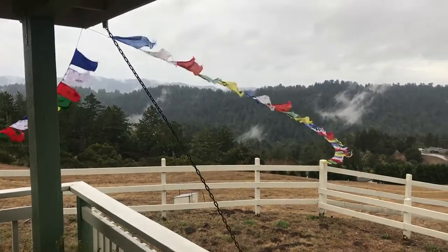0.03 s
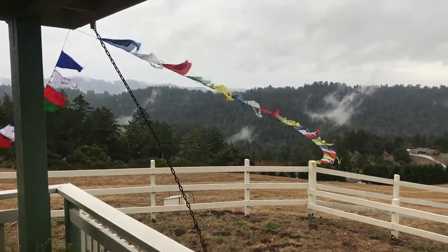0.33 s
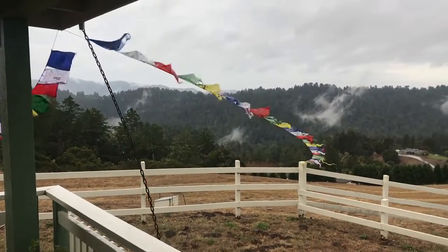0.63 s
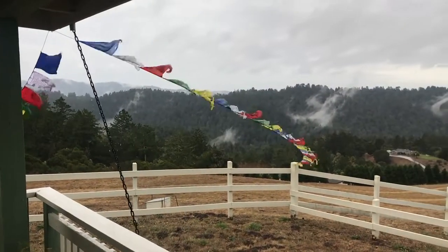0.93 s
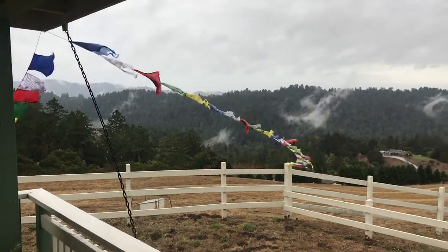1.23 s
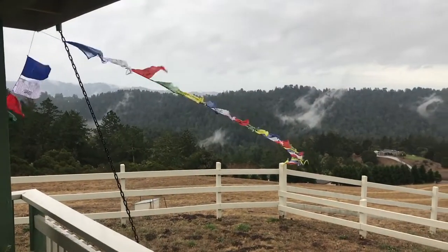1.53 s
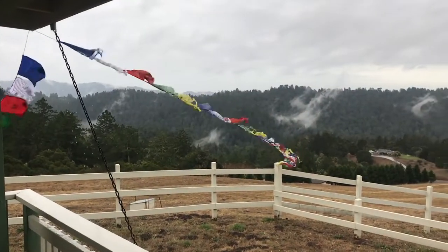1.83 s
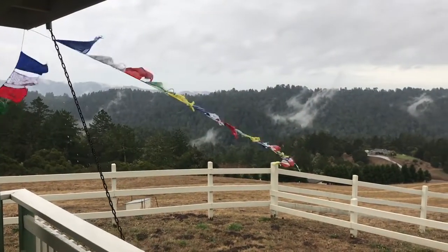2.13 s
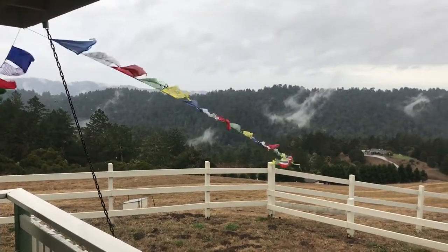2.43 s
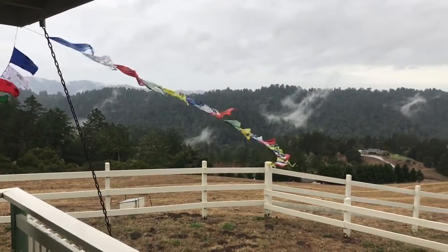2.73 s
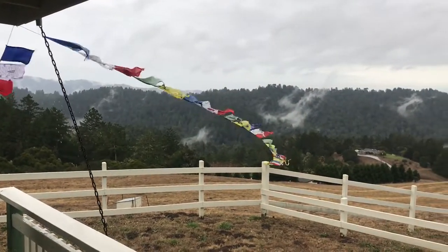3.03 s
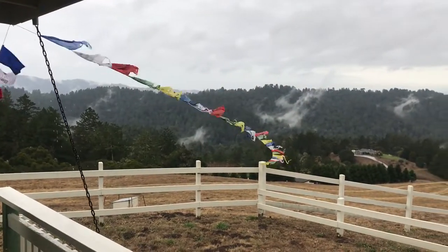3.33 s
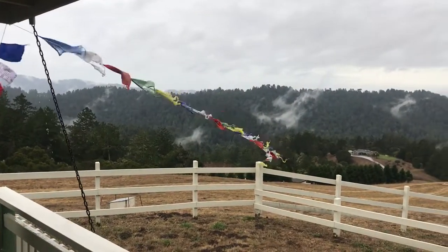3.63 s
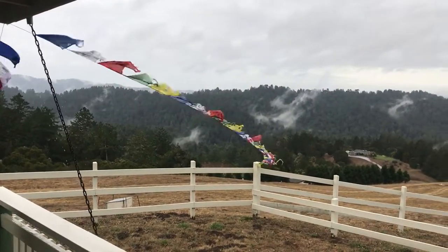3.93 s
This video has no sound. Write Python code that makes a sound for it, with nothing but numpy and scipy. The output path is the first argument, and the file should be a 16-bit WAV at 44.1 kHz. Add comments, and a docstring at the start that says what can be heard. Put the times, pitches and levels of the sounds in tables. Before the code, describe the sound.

Strings of cloth flags flutter outdoors by a porch, with sharp snaps and crisp crackles. Wind rumbles on the microphone at first, then drops to a softer rush in the trees; lighter gusts return as the flapping continues.

```python
"""Strings of small cloth flags in a strong wind, heard on one microphone beside a covered porch.
At first gusts buffet the microphone and the flags flap hard: each flap is a snap and a quick run of
cloth pops, with crisp ticks on top, and the porch throws them back. More gusts hit around 1 s.
Then the rush in the trees behind eases and the flaps soften. Lighter gusts thump in near 3 s,
and the flags flutter on to the end."""
import sys
import numpy as np
from scipy import signal
from scipy.fft import rfft, irfft
from scipy.io import wavfile
from scipy.ndimage import uniform_filter1d

SR = 44100
rng = np.random.default_rng(int(sys.argv[2]) if len(sys.argv) > 2 else 0)


def store_pcm(level_fs):
    """Save levels as 16-bit WAV."""
    pcm = np.round(np.clip(level_fs, -1, 1) * 32767).astype(np.int16)
    wavfile.write(sys.argv[1], SR, np.atleast_2d(pcm).T)


N = 176400
TIME = np.arange(N) / SR
CLOTH_RISE_S = 0.0003


# Spectrum of one pop of cloth (frequency over pitch [ratio], level [dB])
POP_SPECTRUM = [(.03, -18), (.2, -2), (.5, -2), (1, -2.5), (1.4, -9.5), (2, -16.5), (3, -28.5), (6, -40),
                (40, -57)]
# Loud flaps in the foreground (time [s], snap level [dB], ruffle level [dB], pitch [Hz], decay [s])
LOUD_FLAPS = [(0.0335, -26, -31.5, 1100, 0.008), (0.1175, -26, -40, 1900, 0.008),
              (0.16, -32, -38, 280, 0.015), (0.283, -34, -42, 1300, 0.009), (0.365, -38, -44, 1100, 0.02),
              (0.414, -31, -35, 220, 0.012), (0.424, -29, -37, 1000, 0.007), (0.483, -38, -49, 2200, 0.008),
              (0.535, -37, -44, 1200, 0.02), (0.6, -38, -43.5, 900, 0.02), (0.622, -35, -44, 1500, 0.01),
              (0.672, -33, -42.5, 1400, 0.012), (0.731, -32, -41.5, 2000, 0.011),
              (0.76, -37, -43.5, 500, 0.02), (0.96, -39, -45, 800, 0.015), (0.975, -36, -43, 1500, 0.015),
              (1.06, -35, -44, 1300, 0.008), (1.401, -35, -44, 1200, 0.006), (1.483, -39, -48, 1400, 0.008),
              (1.5405, -29, -39, 1800, 0.007), (1.548, -38, -42, 280, 0.012),
              (1.598, -38, -42.5, 300, 0.009), (1.825, -42, -42.5, 320, 0.012),
              (1.914, -41, -43, 310, 0.016), (1.949, -42, -45, 320, 0.01), (2.062, -40, -49.0, 800, 0.02),
              (2.158, -41, -45, 260, 0.012), (2.183, -35, -44.5, 1000, 0.005),
              (2.186, -39, -41, 280, 0.014), (2.214, -39, -49, 1000, 0.012), (2.288, -39, -43, 220, 0.014),
              (2.355, -36, -46, 1000, 0.006), (2.383, -40, -48.5, 700, 0.015),
              (2.542, -38, -44.5, 1100, 0.02), (2.552, -42, -50, 1000, 0.02), (2.594, -43, -49, 750, 0.012),
              (2.645, -41, -46.5, 1100, 0.015), (2.707, -40, -45, 950, 0.008),
              (2.774, -38, -44.5, 1050, 0.017), (2.812, -42, -48, 1000, 0.012),
              (2.9215, -36, -46, 2400, 0.003), (2.962, -38, -44.5, 900, 0.014), (3.02, -41, -50, 750, 0.01),
              (3.073, -37, -45, 700, 0.009), (3.092, -38, -45, 1000, 0.007), (3.135, -35, -42, 850, 0.007),
              (3.3225, -32, -44, 900, 0.012), (3.331, -38, -45, 1000, 0.013),
              (3.4475, -35, -44, 1350, 0.004), (3.453, -33, -40.5, 1350, 0.006),
              (3.583, -43, -47, 600, 0.012), (3.595, -38, -46.5, 900, 0.009),
              (3.699, -44, -51, 1200, 0.008), (3.7395, -43, -50, 1300, 0.008),
              (3.755, -40, -46, 220, 0.012), (3.825, -39, -46, 800, 0.007), (3.878, -38, -44.5, 600, 0.015)]
def flap(snap_db, ruffle_db, pitch_hz, decay_s, snap_lift_db=.8, size=6000):
    """A flag's free edge whips over with a snap, and the cloth ruffles after it."""
    t = np.arange(size) / SR
    ratio, db = np.transpose(POP_SPECTRUM)
    cloth = lambda hz: at_hz(np.c_[ratio * pitch_hz, db], hz)
    snap = colour(1. * (t == 0), cloth)
    run = np.sign(pops(per_s=1500, size=size))
    ruffle = colour(run * (1 - np.exp(-t / CLOTH_RISE_S)) * np.exp(-t / decay_s), cloth)
    ruffle /= np.sqrt(2 * np.sum(ruffle ** 2) / (decay_s * SR)) + 1e-12  # starts near rms 1
    return amp(snap_lift_db + snap_db) * snap / abs(snap).max() + amp(ruffle_db) * ruffle


# Spectrum of the fluttering strings of flags (frequency [Hz], level [dB])
FLUTTER_SPECTRUM = [(30, -47), (120, 3.5), (250, 9), (450, 1), (650, 2.5), (1100, -2.5), (1700, -8),
                    (2400, -11), (3200, -27.5), (6000, -31), (16000, -67)]
def flutter(flags=4, beat_hz=8, unsteady=.25, spread_db=.5, decay_s=0.024, blur_db=-43):
    """Flags beat unevenly, each beat a run of pops; the runs merge as the wind nears blur_db."""
    wind_db = curve(WIND_STRENGTH)
    between_beats = amp(wind_db - blur_db) ** 2
    runs = np.zeros(N)
    for _ in range(flags):
        beats = rng.random() + np.cumsum(beat_hz * np.exp(unsteady * wander(2.8))) / SR
        age_s = beats % 1 / beat_hz
        strength = amp(spread_db * (1 - 2 * rng.random(N)))[beats.astype(int)]
        runs += np.sign(pops(per_s=600, size=N)) * strength * (between_beats + np.exp(-age_s / decay_s))
    return unit(steadied(shaped(runs, FLUTTER_SPECTRUM), window_s=0.15)) * amp(wind_db - 3)


# Flicked hems along the strings (time [s], level [dB], pitch [Hz])
HEM_FLICKS = [(0.483, -41, 2620), (.734, -41, 2290), (1.246, -42.5, 2090), (2.21, -52, 2440),
              (2.224, -56, 2650), (2.977, -47, 2530), (2.982, -47.5, 2800)]
def hem_flick(level_db, pitch_hz, decay_s=0.0029, sag_per_s=3, rough=0.13, size=2000):
    """A taut hem rings for a moment, its pitch sagging as it slackens."""
    t = np.arange(size) / SR
    grain = unit(uniform_filter1d(rng.standard_normal(size), size=40))
    ring = np.sin(2 * np.pi * np.cumsum(pitch_hz * np.exp(-sag_per_s * t)) / SR)
    envelope = (1 - np.exp(-t / CLOTH_RISE_S)) * np.exp(-t / decay_s)
    return amp(level_db) * ring * (1 + rough * grain) * envelope


# Crisp ticks on top of the flaps (time [s], level [dB], centre [Hz], width [octaves], decay [s])
CRISP_TICKS = [(.012, -41, 12000, .4, .006), (.02, -39, 4500, .8, .008), (.07, -40, 5000, 1, .008),
               (.105, -37, 5500, 1.1, .005), (.1178, -26, 3900, .7, .0004), (.1745, -35, 10000, .45, .0025),
               (.211, -43, 5000, .9, .003), (.242, -41, 5500, .9, .003), (.274, -43, 10000, .7, .005),
               (.424, -44, 12000, .6, .008), (.467, -40, 5000, .7, .001), (.483, -36, 4200, .7, .0012),
               (.568, -39, 8000, .9, .0015), (.625, -42, 4200, .6, .005), (.674, -38, 3400, .9, .004),
               (.775, -46, 11000, .7, .012), (.862, -42, 3200, .8, .014), (.963, -44, 12000, .4, .002),
               (.983, -42, 13000, .3, .001), (.99, -44, 10000, .9, .005), (1.204, -46, 9000, 1, .002),
               (1.2725, -43, 11000, .9, .001), (1.335, -42, 11000, .5, .0015),
               (1.474, -41, 6000, 1.1, .0006), (1.4805, -38, 6000, 1, .0008),
               (1.631, -38, 10000, 1.1, .0012), (1.707, -42, 5000, .6, .001), (1.829, -47, 9500, .8, .004),
               (1.934, -42, 12000, .35, .0015), (2.067, -43, 5500, 1, .003), (2.105, -50, 11000, .6, .006),
               (2.157, -47, 11000, .6, .0015), (2.168, -47, 5000, .6, .002),
               (2.185, -43, 10500, .35, .0012), (2.398, -53, 7400, .035, .013),
               (2.406, -49, 8700, .2, .003), (2.542, -44, 4000, .6, .001), (2.9215, -39, 4500, 2, .0014),
               (3.127, -44, 11500, .6, .003), (3.18, -47, 4500, .7, .002), (3.228, -48, 11500, .4, .004),
               (3.255, -47, 8500, .5, .002), (3.421, -47, 13000, .6, .004), (3.7405, -42, 4300, 1, .0013),
               (3.858, -48, 7700, .2, .002), (3.9425, -35, 11300, .18, .001),
               (3.977, -43, 10300, .18, .0012)]
def tick(level_db, centre_hz, octaves, decay_s, trim_db=-3, size=4096):
    """A very short burst of noise in one treble band."""
    burst = rng.standard_normal(size) * np.exp(-np.arange(size) / SR / decay_s)
    off_centre = lambda hz: np.log2((hz + 1) / centre_hz) / octaves
    burst = colour(burst, lambda hz: -20 * np.log10(1 + off_centre(hz) ** 2).clip(0, 3))
    return amp(level_db + trim_db) * burst / abs(burst).max()


# Spectrum of creasing cloth (frequency [Hz], level [dB])
CRINKLE_SPECTRUM = [(500, -43), (2500, 20), (4000, 2), (6000, 10), (7400, -4), (9400, 7), (10400, 8),
                    (12000, -3), (16000, 5)]
def crinkle(grain_s=0.0012, follow=0.94, under_wind_db=20, size=600):
    """Creasing cloth crackles faintly in clumps, fading with the wind."""
    clumps = amp(2 * wander(20))
    creases = pops(per_s=340, size=N) * clumps
    power = signal.fftconvolve(creases ** 2, np.exp(-2 * np.arange(size) / SR / grain_s))[:N]
    crackle = shaped(np.sqrt(abs(power)) * rng.standard_normal(N), CRINKLE_SPECTRUM)
    wind_db = curve(WIND_STRENGTH)
    return crackle * amp(wind_db.mean() - under_wind_db + follow * (wind_db - wind_db.mean()))


# Reverberation under the porch roof (frequency [Hz], time to fall 60 dB [s])
PORCH_DECAY = [(100, 0.56), (1000, 0.18), (4000, 0.24), (15000, 0.28)]
def porch(x, wet_db, gap_s=.003):
    """Adds sparse reflections from the nearby roof, wall and deck; the bass lingers longest."""
    size = 16384
    reflections = pops(per_s=2500, size=size) * (np.arange(size) > gap_s * SR)
    hz, t, bands = signal.stft(reflections, SR, nperseg=256)
    tail = signal.istft(bands * amp(-60 * t / at_hz(PORCH_DECAY, hz)[:, None]), SR)[1]
    return x + amp(wet_db) * signal.fftconvolve(x, tail / np.linalg.norm(tail))[:N]


# Gusts right on the microphone (time [s], deep rumble level [dB], upper rumble over deep [dB])
MIC_GUSTS = [(0, -35, -3), (.04, -44, -17), (0.061, -33.5, 3), (.1, -50, 10), (.13, -46.5, 11),
             (0.169, -35.5, 2.5), (.2, -42, -15), (.24, -35, -4), (.3, -44, 0), (.33, -61, -14),
             (.36, -35.5, -14), (.39, -40.5, -10), (0.419, -46.5, 13.5), (.46, -49.5, -18),
             (.8, -56.5, -11), (.9, -55.5, 8.5), (.97, -43, -12.5), (1.01, -39.5, -7), (1.07, -41, -3.5),
             (1.13, -54, 0), (1.21, -51, -32), (1.275, -34, -33), (1.32, -57, -17), (1.35, -43, -32),
             (1.42, -62, -4.5), (2.2, -59.5, 1.5), (2.5, -62, -22), (2.63, -54.5, -12), (2.72, -66, -13),
             (2.87, -54, 2), (2.92, -55, -4), (2.965, -46, -6), (3.06, -49, -15), (3.15, -51, -5),
             (3.2, -58, -11), (3.24, -49.5, 3), (3.28, -59.5, -8), (3.5, -69, 10), (3.74, -64.5, 5),
             (4, -61, -22)]
# Spectra of the deep and the upper rumble (frequency [Hz], level [dB])
DEEP_RUMBLE = [(18, -50), (30, -38), (45, 0.5), (70, 5.5), (95, -5), (140, -27), (300, -32), (2000, -102)]
UPPER_RUMBLE = [(40, -31.5), (90, -0.5), (140, 4.5), (185, -5.5), (280, -14), (600, -16), (2000, -81)]
def buffet(window_s=0.022):
    """Turbulence at the microphone: two rumbles whose balance shifts from gust to gust."""
    s, deep_db, upper_db = np.transpose(MIC_GUSTS)
    deep = steadied(shaped(rng.standard_normal(N), DEEP_RUMBLE), window_s)
    upper = steadied(shaped(rng.standard_normal(N), UPPER_RUMBLE), window_s)
    return amp(np.interp(TIME, s, deep_db)) * (deep + amp(np.interp(TIME, s, upper_db)) * upper)


# Single thumps of air on the microphone (time [s], level [dB], pitch [Hz])
MIC_THUMPS = [(0.055, -27, 121), (0.139, -24.5, 152), (.163, -27, 132), (0.23, -24.5, 101),
              (.417, -39, 110), (0.95, -32.5, 80), (1.051, -34, 151), (1.072, -30, 83.6), (1.271, -33, 65),
              (2.926, -36, 99), (2.964, -38, 121), (3.004, -41, 75), (3.045, -43, 84.6),
              (3.148, -37.5, 84.4), (3.166, -37.5, 89), (3.235, -36.5, 100)]
def thump(level_db, pitch_hz, half_size=2000):
    """An eddy passes the microphone: a smooth dip in pressure between two small rises."""
    phase = np.pi * pitch_hz * np.arange(-half_size, half_size) / SR
    return amp(level_db) * (2 * phase ** 2 - 1) * np.exp(-phase ** 2)


# Strength of the wind, in the trees and on the flags (time [s], level [dB])
WIND_STRENGTH = [(0, -44), (.3, -43.5), (.42, -44), (.62, -43.5), (.8, -45), (1.05, -47), (1.35, -49),
                 (1.68, -48), (1.9, -51.5), (2.2, -51.5), (2.45, -53.5), (2.8, -53), (3.2, -52),
                 (3.65, -55), (4, -54)]
# Spectra of the rush and the hiss in the trees (frequency [Hz], level [dB])
RUSH_SPECTRUM = [(20, -6.5), (45, -0.5), (100, -15.5), (150, -1), (220, -1), (300, -5.5), (450, -7),
                 (700, -7.5), (1400, -11), (2200, -20), (3000, -31), (4300, -28.5), (4800, -33),
                 (6000, -37), (7500, -31), (16000, -97)]
HISS_SPECTRUM = [(1000, -41), (3000, 6.5), (6000, -5), (7400, -1), (9400, -2), (10400, -4.5), (11600, 1),
                 (14000, -6.5), (16000, -8)]
def wind_in_trees(rush_db=-1.16, swirl_db=1.1, hiss_db=-39, hiss_follow=0.59, shimmer_db=.9):
    """Behind the flags, a broad rush follows the wind and a fine hiss follows it less."""
    wind_db = curve(WIND_STRENGTH)
    rush = shaped(rng.standard_normal(N), RUSH_SPECTRUM)
    rush *= amp(rush_db + wind_db + swirl_db * wander(11))
    hiss = shaped(rng.standard_normal(N), HISS_SPECTRUM)
    hiss *= amp(hiss_db + hiss_follow * wind_db + shimmer_db * wander(9.6))
    return rush + hiss


def amp(db):
    """Decibels to gain."""
    return 10 ** (np.asarray(db) / 20)


def unit(x):
    """Scales to rms 1."""
    return x / np.sqrt(np.mean(x ** 2) + 1e-20)


def curve(points):
    """A control curve at every sample."""
    return np.interp(TIME, *np.transpose(points))


def at_hz(points, hz):
    """Reads a table along a log-frequency axis."""
    f, value = np.transpose(points)
    return np.interp(np.log(hz + 1), np.log(f), value)


def add(mix, s, sound):
    """Mixes a sound in at time s."""
    part = mix[max(round(s * SR), 0):][:len(sound)]
    part += sound[:len(part)]


def colour(x, shape_db, size=4096):
    """Minimum-phase filter whose gain in dB is a function of frequency."""
    log_gain = np.log(amp(shape_db(abs(np.fft.fftfreq(size, 1 / SR)))))
    response = np.exp(np.conj(signal.hilbert(log_gain)))
    taps = np.fft.ifft(response).real[:size // 2]
    return signal.fftconvolve(x, taps)[:len(x)]


def shaped(x, spectrum):
    """Gives x a spectrum, at rms 1."""
    return unit(colour(x, lambda hz: at_hz(spectrum, hz)))


def wander(rate_hz):
    """Random drift around a rate, at rms 1."""
    hz = np.fft.rfftfreq(N, 1 / SR)
    return unit(irfft(rfft(rng.standard_normal(N)) * hz / rate_hz * np.exp(-hz / rate_hz), N))


def pops(per_s, size):
    """Random sharp impulses of either sign."""
    return rng.standard_normal(size) * (rng.random(size) < per_s / SR)


def steadied(x, window_s):
    """Evens out the loudness of x, keeping its fine detail."""
    power = uniform_filter1d(abs(signal.hilbert(x)) ** 2 / 2, int(window_s * SR))
    return x / np.sqrt(abs(power) + 0.019)


def scene():
    """Flags and ticks with their porch reflections; the trees and the gusts arrive dry."""
    flags, ticks, air = flutter(), crinkle(), wind_in_trees() + buffet()
    for s, *row in LOUD_FLAPS:
        add(flags, s, flap(*row))
    for s, *row in HEM_FLICKS:
        add(flags, s, hem_flick(*row))
    for s, *row in CRISP_TICKS:
        add(ticks, s, tick(*row))
    for s, *row in MIC_THUMPS:
        eddy = thump(*row)
        add(air, s - len(eddy) / 2 / SR, eddy)  # centred on its time
    return (porch(flags, wet_db=-10.5) + porch(ticks, wet_db=-8) + air)[None]


# Narrow dips in the microphone's response (frequency [Hz], width [Hz], level [dB])
RESPONSE_DIPS = [(463.7, 31, -3.5), (4930, 150, -2.5), (7590, 620, -4.5), (10670, 1000, -4)]
def record(dry, low_cut_hz=35.5, band_limit_hz=15880):
    """The microphone's low cut and colour, then the recorder's band limit."""
    low_cut = signal.butter(4, low_cut_hz, "high", fs=SR, output="sos")
    dips = lambda hz: sum(db * np.exp(-((hz - f) / width) ** 2) for f, width, db in RESPONSE_DIPS)
    band_limit = signal.firwin(511, band_limit_hz, window=("kaiser", 9), fs=SR)
    heard = colour(signal.sosfilt(low_cut, dry[0]), dips)
    return signal.oaconvolve(heard, band_limit, "same")[None]


dry = scene()
out = record(dry)
store_pcm(out)
```